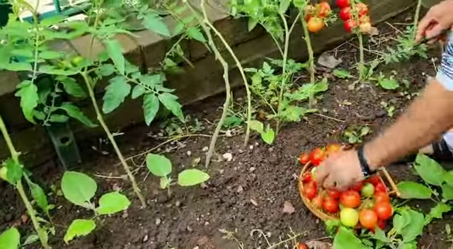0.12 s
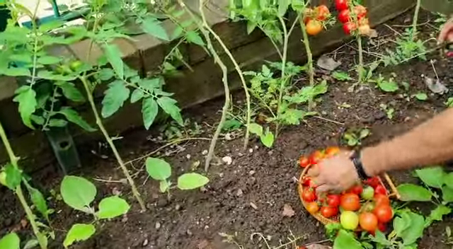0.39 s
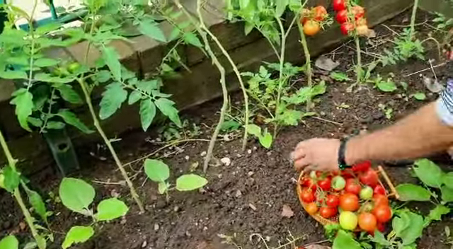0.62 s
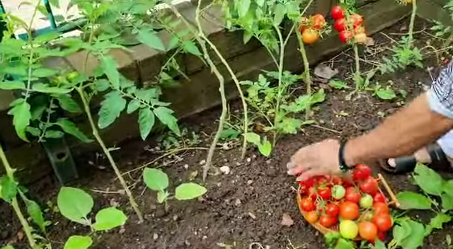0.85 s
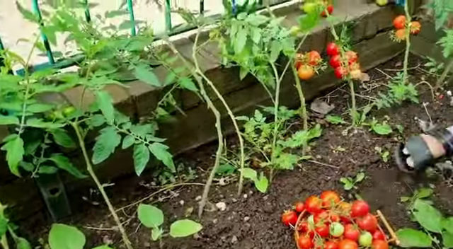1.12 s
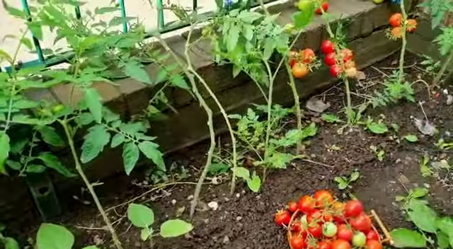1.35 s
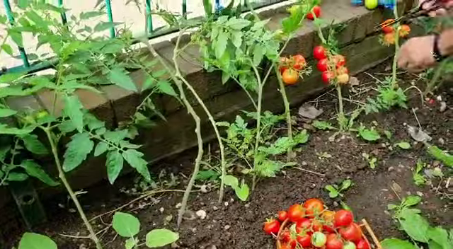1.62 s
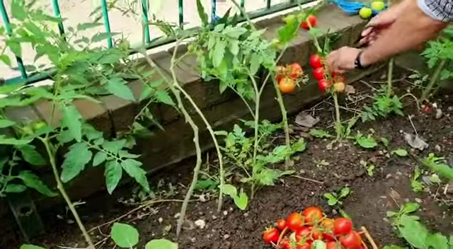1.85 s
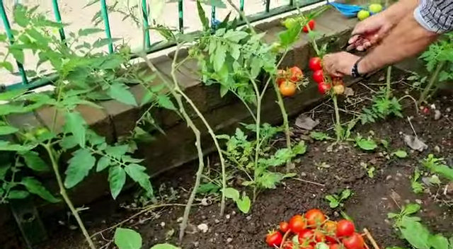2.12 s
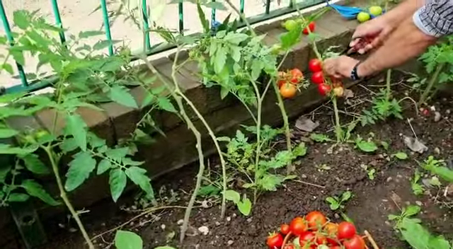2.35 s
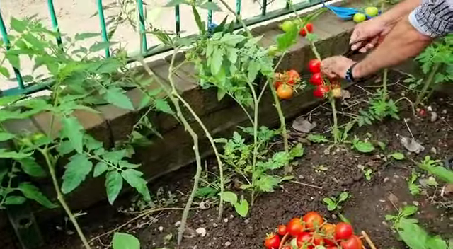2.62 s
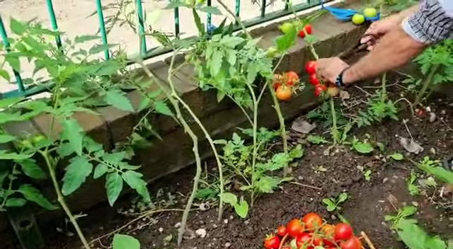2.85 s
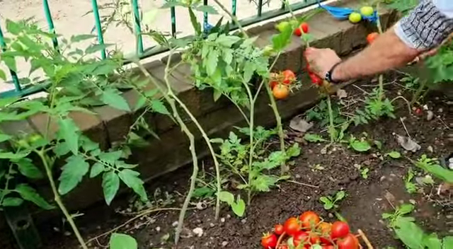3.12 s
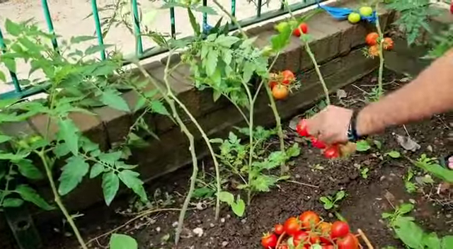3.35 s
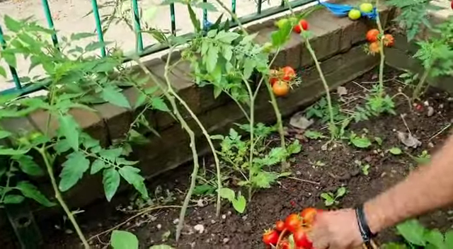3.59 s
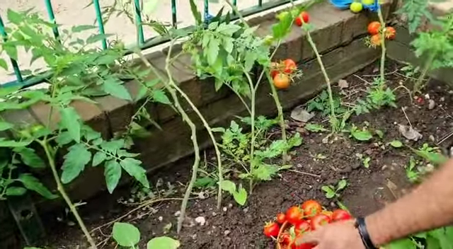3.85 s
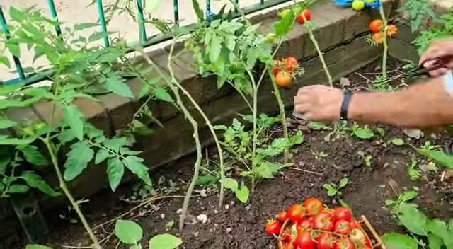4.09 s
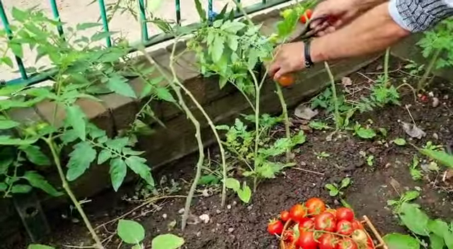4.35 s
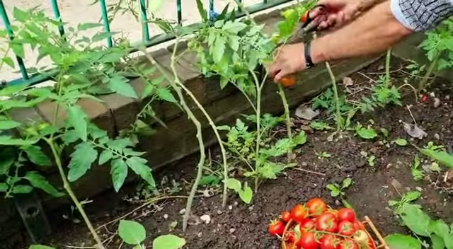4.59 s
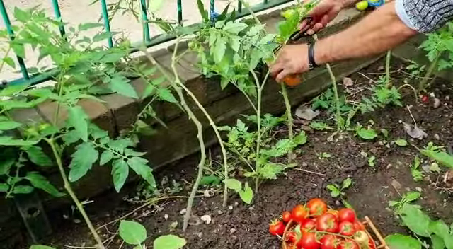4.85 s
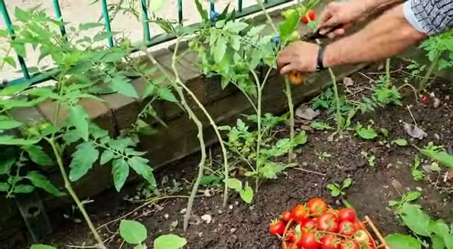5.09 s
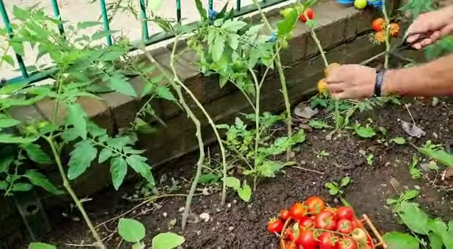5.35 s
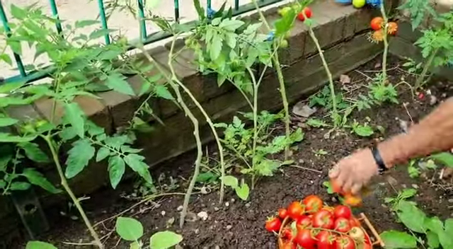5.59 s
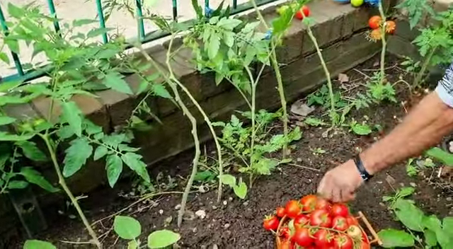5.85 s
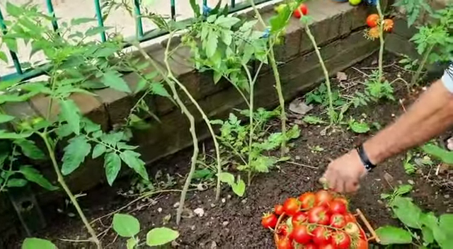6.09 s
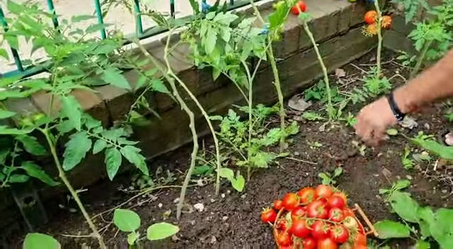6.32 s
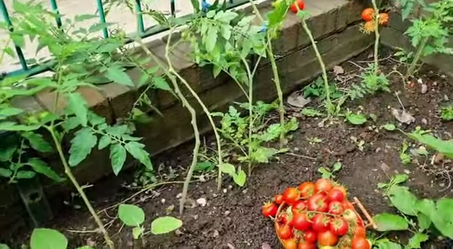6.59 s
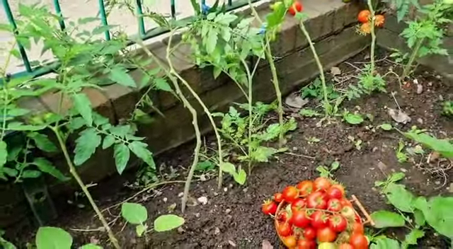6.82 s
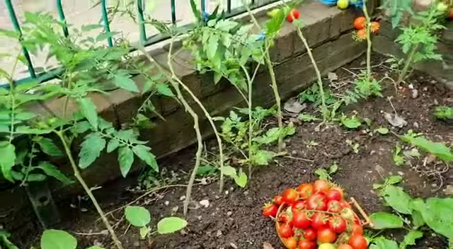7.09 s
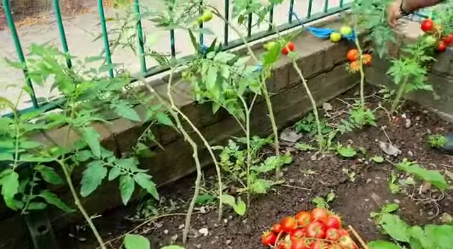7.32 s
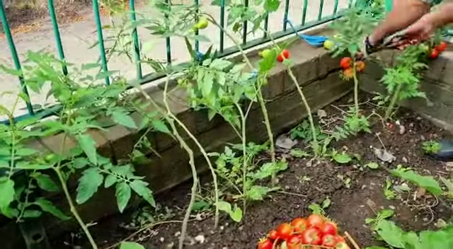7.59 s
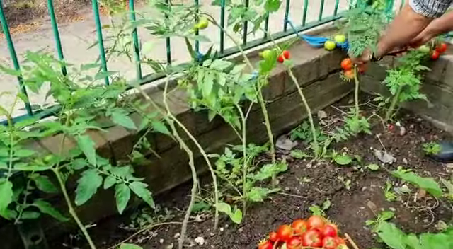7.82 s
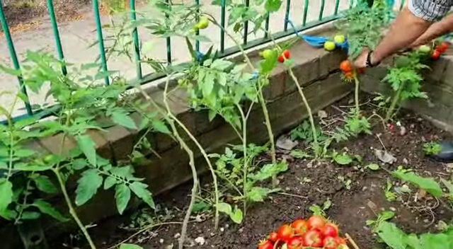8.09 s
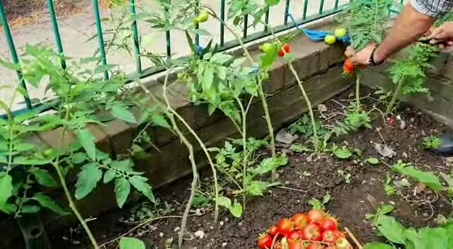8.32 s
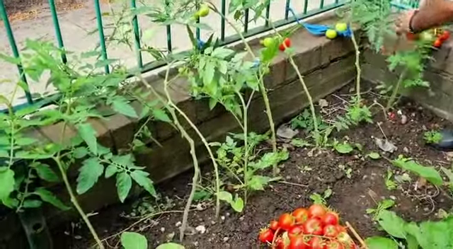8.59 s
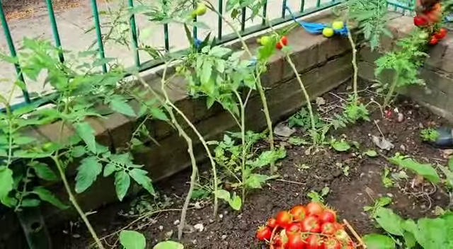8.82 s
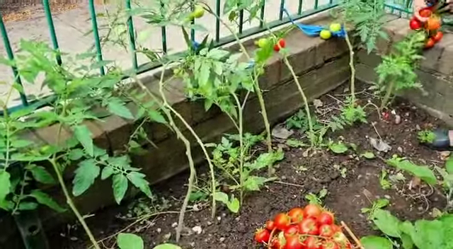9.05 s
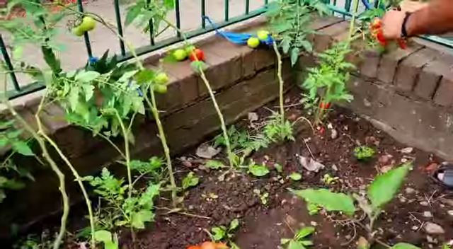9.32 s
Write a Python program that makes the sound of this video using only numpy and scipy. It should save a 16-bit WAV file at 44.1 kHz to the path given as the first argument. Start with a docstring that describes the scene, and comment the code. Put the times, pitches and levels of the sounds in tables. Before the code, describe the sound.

Distant crow caws and a chattering flock fill a quiet garden. A bright shear snip sounds before three seconds, followed by a run of strong, buzzing bird whistles with falling croaky ends. Another snip comes near five seconds, and more rapid chirps follow, some leaping up in pitch. Late on, the air thins almost to silence among small knocks and scuffs, then a loud caw. Close outdoor stereo pickup, distant birds blurred by trees.

```python
"""Throbbing, raspy chirps of one near bird echo off far walls, while crows caw, small birds chatter and a far whistle glides.
Close by, shears snip stalks and leaves tick; soft knocks and rustles come from the ground, and dull low thumps
sound, two of them under loud chirps. Birds are swept sines with noise for breath and hoarseness; shears are ringing
blades with a noise crunch. Below lies wide patchy noise for the garden air, with a centred engine hum and thin tones."""
import sys
import numpy as np
from scipy import signal
from scipy.fft import rfft, irfft, next_fast_len
from scipy.io import wavfile
from scipy.ndimage import uniform_filter1d, map_coordinates

SR = 44100
rng = np.random.default_rng(int(sys.argv[2]) if len(sys.argv) > 2 else 0)


def attenuation_scalar(level_db):
    """Turn a level in dB into a linear amplitude multiplier (20 dB per decade)."""
    decades = np.asarray(level_db, float) / 20
    return 10 ** decades


def pcm_store(signal):
    """Save signal as 16-bit PCM."""
    levels = np.round(np.clip(np.atleast_2d(signal), -1, 1) * 32767)
    wavfile.write(sys.argv[1], SR, levels.astype(np.int16).T)


N = 416304
TIME = np.arange(N) / SR

# Levels in the tables are relative: many sources add a trim.
# Garden air, unlike in both ears. Each row: frequency in Hz, density in dB per Hz.
WIDE_AIR = [(15, -38.5), (25, -6), (70, -1.5), (212, -10), (326, -11), (503, -16.5), (1260, -17),
            (1840, -18.5), (3250, -28.5), (3720, -25), (7310, -45.5), (12500, -42), (16000, -39.5)]
# Air around the birds. Each row: frequency in Hz, density in dB per Hz.
CENTRE_AIR = [(15, -29.5), (25, -11.5), (102, -13), (175, -23), (335, -8), (427, -24), (503, -11),
              (575, -14), (887, -9.5), (1560, -12.5), (2220, -18.5), (3340, -20.5), (4870, -23.5),
              (6210, -27), (16000, -39)]
# Garden level, which fades out and back. Each row: time in seconds, level in dB.
GARDEN_LEVEL = [(0, -62), (2.5, -61.5), (5, -64.5), (8.2, -64), (8.45, -95), (9.05, -101.5), (9.25, -71.5),
                (9.44, -63.5)]
# Far engine. Each row: time in seconds, pitch in Hz, level in dB.
ENGINE_HUM = [(0.0, 97.8, -56), (0.47, 119.4, -56), (0.72, 110, -68), (0.88, 92.6, -59.5),
              (1.13, 89.9, -70), (1.25, 79.8, -61), (1.71, 98.9, -64.5), (2.45, 115, -56.5),
              (2.6, 89.94, -76), (2.87, 76.9, -64), (4.4, 86.7, -77.5), (4.63, 77.5, -63),
              (5.07, 95, -64.5), (5.63, 78.1, -63.5), (5.81, 100.1, -55.5), (6.18, 82, -65),
              (6.52, 88, -62.5), (6.7, 78, -71.5), (7.86, 75.9, -64.5), (8.3, 79.3, -77.5),
              (9.44, 80.3, -74)]
# Thin steady tones. Each row: frequency in Hz, level in dB at the start.
THIN_TONES = [(1900, -91), (3800, -76)]
# Feet and basket shifting on soil. Each row: start in seconds, hold in seconds, level in dB.
SOIL_SCUFFS = [(6.57, 0.034, -55.5), (8.28, 0.02, -60.5), (8.393, .01, -60), (8.5, 0.05, -69),
               (8.628, 0.025, -59.5), (8.722, 0.016, -60.5), (8.872, 0.012, -77), (9.025, .012, -70),
               (9.138, .012, -67)]
# Dull low thumps. Each row: start in seconds, hold in seconds, level in dB.
LOW_THUMPS = [(3.63, .03, -55.5), (4.16, 0.036, -44.5), (6.57, 0.014, -57)]
# Bursts of the flock. Each row: start in seconds, hold in seconds, then mid, high and low voices in dB.
FLOCK_BURSTS = [(0.14, .15, -59.5, -59, -67.5), (0.35, .2, -65, -58, -67), (0.753, .08, -63.5, -54.5, -72),
                (0.88, .06, -56, -64.5, -60), (1.444, .05, -60.5, -57.5, -67.5),
                (1.534, .06, -58, -60.5, -63.5), (1.745, .02, -68.5, -80, -71),
                (1.986, .2, -54.5, -58.5, -59), (2.284, .13, -56, -55.5, -65),
                (2.578, .03, -65, -60.5, -83.5), (2.667, .07, -80, -65.5, -68.5),
                (2.841, .14, -54, -53.5, -79), (3.019, .13, -61, -61, -72), (3.257, .02, -61, -61, -61),
                (3.383, .01, -64.5, -66, -69), (3.491, .05, -60, -59, -63), (3.787, .07, -60.5, -68, -68),
                (4.34, .02, -75, -67, -63), (4.426, .05, -85, -77, -85), (4.66, .03, -77, -80, -81),
                (4.802, .05, -65.5, -69, -71), (4.949, .08, -73, -71, -68), (5.083, .06, -72, -70, -70.5),
                (5.366, .03, -63, -75.5, -71), (5.469, .04, -74, -74, -63.5), (5.65, .06, -64.5, -61, -66),
                (5.892, .06, -66.5, -65, -67), (6.062, .1, -66.5, -64.5, -90),
                (6.217, .07, -61.5, -59, -69), (6.418, .05, -59.5, -61, -59.5),
                (6.56, .18, -68, -76, -70.5), (7.012, .05, -61.5, -62, -76),
                (7.128, .01, -68.5, -71.5, -62.5), (7.52, .03, -78, -73, -81), (7.636, .06, -74, -73, -68),
                (7.833, .02, -64, -75.5, -80), (7.888, .02, -93, -83, -67), (7.99, .02, -76.5, -87, -90.5),
                (8.364, .11, -65.5, -79.5, -68.5), (8.547, .3, -82, -106, -72),
                (9.135, .04, -71, -68.5, -65), (9.33, .11, -70.5, -61.5, -60.5)]
# Far whistle. Each row: start in seconds, hold in seconds, level in dB, first pitch in Hz, top pitch in Hz.
FAR_GLIDES = [(1.67, 0.095, -64, 1235, 1291), (3.83, 0.21, -64, 1020, 1316), (5.4, 0.27, -60, 1039, 1341),
              (7.5, .45, -68, 1083, 1383)]
# Short, rough high notes of small birds. Each row: start in seconds, hold in seconds, level in dB,
# first and last pitch in Hz.
HIGH_NOTES = [(.868, 0.003, -42, 5020, 4980), (1.465, 0.026, -55, 5250, 4965),
              (1.532, .01, -50.5, 4998, 5070), (2.153, 0.0051, -46.5, 5030, 5300),
              (2.66, 0.022, -66, 4308, 4430), (5.81, 0.031, -58.5, 6150, 6000),
              (5.875, 0.052, -60.5, 5260, 4970), (6.435, 0.055, -70, 2930, 2790),
              (8.335, .03, -57.5, 5940, 5815), (8.39, .012, -55.5, 6010, 6096),
              (8.43, .07, -64.5, 5930, 5750), (9.135, 0.029, -51.5, 3950, 3240),
              (9.345, 0.025, -56, 6130, 6560)]
# Short low notes far off. Each row: start in seconds, hold in seconds, level in dB, first and last pitch in Hz.
LOW_NOTES = [(8.557, 0.0047, -59, 1374, 1500), (8.862, 0.018, -65, 880, 888), (8.975, 0.011, -63, 894, 913),
             (9.028, .01, -65, 903, 900)]
# Crows. Each row: start in seconds, hold in seconds, level in dB, strongest overtone in Hz, lower overtones in dB.
CROW_CAWS = [(.13, 0.18, -53, 1955, -11.5), (.36, .17, -42, 1688, -11), (.74, .1, -43, 1963, -12.5),
             (1.41, .17, -45, 1703, -10), (1.86, 0.032, -59, 1731, -2), (2.0, .12, -43, 1774, -13.5),
             (2.24, 0.088, -44, 1982, -12.5), (2.4, .1, -54, 1848, -4), (2.84, .22, -52, 1940, -3.5),
             (3.25, .08, -61, 1862, -2), (4.93, 0.2, -50.5, 1720, -17), (5.38, .17, -58, 1641, -2),
             (5.6, .12, -48, 1616, -13), (5.85, 0.095, -62.5, 1760, -3), (6.08, .12, -53, 1897, -7.5),
             (6.23, .11, -41, 1713, -12), (6.41, .1, -54, 1770, -13), (6.87, .13, -47, 1738, -12.5),
             (7.06, .07, -54, 1658, -9.5), (7.53, 0.358, -66, 1713, 4.5), (8.42, 0.16, -59.5, 1722, -20),
             (8.96, 0.019, -58, 1719, -16), (9.07, .04, -65.5, 1653, -24), (9.285, .16, -39, 2041, -13.5)]
# Shears closing. Each row: time in seconds, level in dB, ring in Hz, left over right in dB, crunch in dB.
SHEAR_SNIPS = [(2.777, -13.5, 14000, -3.5, -10), (5.111, -14.5, 13500, 2.5, -17.5),
               (8.2135, -27, 13490, -9, -27)]
# Ringing of the blades. Each row: frequency in Hz, level in dB, 60 dB decay in seconds.
BLADE_RINGS = [(2130, -18.5, 0.019), (10100, -6, 0.00626), (12600, 0, 0.0049), (13500, -0.5, 0.0064),
               (15000, -10.5, 0.017)]
# Ticking leaves. Each row: time in seconds, level in dB, left over right in dB.
LEAF_TICKS = [(1.278, -38, -4.5), (1.4284, -44, 19), (6.51, -51.5, 0.5), (6.576, -60, -3),
              (8.0376, -43.5, -1), (8.2854, -46, 7), (8.387, -37.5, 7), (8.9035, -43.5, 2),
              (9.148, -44.5, 1)]
# Knocks on soil and basket. Each row: time in seconds, level in dB, pitch in Hz, left over right in dB.
SOFT_KNOCKS = [(1.876, -38, 1083, 2), (6.573, -40.5, 241.3, -9), (8.395, -34, 351, 0.0),
               (8.5, -53, 383, 0.0), (8.53, -48, 151, 0.0), (8.626, -48, 273, 1), (8.72, -50, 308, 0.0),
               (8.744, -51, 339, 0.0), (9.096, -59.5, 872, 0.0), (9.146, -51, 277, 0.0)]
# The near bird's whistle, a list for each stretch; a note that leaps in pitch has several.
# Each row: time in seconds, pitch in Hz, level in dB, octave in dB.
WHISTLE_STRETCHES = [
    [(2.02, 3530, -56, -46), (2.05, 3670, -56, -47), (2.066, 3590, -50, -46), (2.08, 3550, -49, -42),
     (2.095, 3600, -60, -52)],
    [(3.355, 3525, -45, -35), (3.375, 3397, -56, -46), (3.39, 3460, -32, -26.5), (3.402, 3410, -32, -29.5),
     (3.425, 3480, -26.5, -25), (3.44, 3390, -25, -32), (3.455, 3590, -47, -38), (3.485, 3550, -57, -42)],
    [(3.584, 3510, -48, -41), (3.594, 3640, -46, -36), (3.602, 3520, -56, -47), (3.609, 3510, -37, -23.5),
     (3.628, 3645, -35, -20.5), (3.648, 3550, -28.5, -22.5), (3.66, 3530, -28, -32),
     (3.675, 3490, -37, -41), (3.695, 3100, -39, -63), (3.725, 3080, -39, -66), (3.76, 3150, -51, -55)],
    [(3.897, 3636, -58, -38), (3.912, 3546, -35, -35), (3.925, 3296, -26.5, -41), (3.942, 3323, -18.5, -30),
     (3.963, 3290, -19.5, -24.5), (3.983, 3250, -17, -31), (3.995, 3130, -28, -39), (4.005, 3620, -49, -32),
     (4.025, 3750, -61, -33)],
    [(4.136, 3360, -35, -32.5), (4.15, 3530, -36, -23.5), (4.168, 3660, -32, -18.5),
     (4.187, 3630, -33, -18.5), (4.203, 3530, -27.5, -26), (4.215, 3330, -21, -35),
     (4.226, 3320, -28.5, -55), (4.24, 3290, -48.5, -53), (4.275, 3210, -42.5, -61),
     (4.305, 3510, -48.5, -52)],
    [(4.505, 3560, -63, -35), (4.52, 3620, -57, -46), (4.528, 3450, -28.5, -20.5),
     (4.539, 3180, -29, -43.5), (4.568, 3235, -23, -37), (4.59, 3198, -22, -35), (4.606, 3083, -24, -37),
     (4.615, 3070, -44, -46)],
    [(6.296, 3236, -48.5, -36), (6.312, 3298, -38, -39), (6.321, 3440, -26, -26), (6.329, 3270, -31, -30.5),
     (6.336, 2986, -28, -29.5), (6.35, 2958, -27, -23), (6.37, 2958, -27, -27), (6.384, 3015, -41, -44),
     (6.392, 3065, -42, -46)],
    [(6.872, 3195, -55, -36), (6.888, 3255, -32.5, -39), (6.9, 3290, -33.5, -41.5)],
    [(6.901, 4750, -30, -62), (6.914, 4940, -24.5, -60), (6.931, 4810, -33, -56)],
    [(6.932, 3420, -24.5, -26), (6.955, 3166, -22.5, -34), (6.975, 3250, -25, -31), (6.995, 3224, -36, -53)],
    [(7.138, 3126, -36, -34), (7.156, 3200, -38.5, -52), (7.167, 3167, -26, -41), (7.182, 3004, -19, -31),
     (7.193, 3032, -18.5, -27.5), (7.207, 3003, -21, -24.5), (7.22, 3004, -24.5, -25),
     (7.232, 3110, -36, -33.5), (7.252, 3020, -42, -53)],
    [(7.362, 3540, -43, -74), (7.376, 3300, -35.5, -45), (7.381, 3140, -22.5, -26),
     (7.392, 3535, -22.5, -31.5)],
    [(7.393, 4870, -23.5, -39), (7.414, 5110, -23, -41.5), (7.438, 4945, -26.5, -46)],
    [(7.439, 3370, -27, -34), (7.46, 3360, -24, -35.5), (7.478, 3363, -28.5, -48), (7.5, 3243, -41.5, -52)],
]
# Runs of throbbing. Each row: first crest in seconds, length in seconds (rounded to whole throbs),
# throbs per second, depth (kept within 0-1), glide within a throb in Hz before scaling.
THROB_RUNS = [(2.027, .06, 130, 0.73, -3.5), (3.3575, .125, 116, 0.89, 94), (3.592, .011, 160, .8, 32.5),
              (3.6092, .05, 58, 1, 29.5), (3.663, .09, 95, 0.72, -150), (3.9034, .115, 112, 0.86, -50.5),
              (4.148, .054, 55, .9, 50), (4.213, .09, 150, 0.73, 97), (4.506, .1, 117, 0.74, -21),
              (6.3034, .019, 120, 0.84, 53.5), (6.321, .024, 42, 1, -20), (6.346, .024, 39, 0.8, -19.5),
              (6.877, .022, 95, .7, -0.5), (6.907, .022, 98, .4, 55), (6.9348, .056, 125, .8, -350),
              (7.144, .036, 82, .95, -200), (7.18, .05, 72, .3, -1.5), (7.2304, .02, 110, 0.9, -48.5),
              (7.37, .02, 95, 0.38, 201.5), (7.399, .036, 111, 0.54, 52), (7.4364, .055, 190, 0.71, -300)]
# Hoarse breath of the near bird. Each row: start in seconds, hold in seconds, level in dB.
BREATHS = [(2.035, .03, -55), (3.378, 0.086, -53.5), (3.64, 0.033, -63), (3.694, 0.062, -65.5),
           (3.92, .01, -50.5), (3.988, 0.029, -53.5), (4.152, 0.038, -63.5), (4.222, 0.072, -57.5),
           (4.509, 0.064, -60.5), (4.61, 0.017, -57), (6.305, .035, -56.5), (6.378, 0.0092, -51.5),
           (6.893, 0.011, -53.5), (6.938, 0.041, -49), (7.157, 0.0094, -46), (7.23, 0.01, -54.5),
           (7.386, 0.0047, -53), (7.435, 0.046, -52)]
# Colour of that breath. Each row: frequency in Hz, density in dB per Hz.
BREATH_COLOUR = [(530, -46.5), (900, -13.5), (1440, -14.5), (1900, -16), (2450, -8.5), (2890, -4.5),
                 (3260, -6), (4460, -7), (5480, -9.5), (6410, -9), (7580, -2.5), (8660, -46), (10100, -38),
                 (13200, -31), (16000, -67.5)]
# Falling ends of the chirps. Each row: start in seconds, hold in seconds, level in dB, first and last pitch in Hz.
CHIRP_CROAKS = [(3.447, .03, -46.5, 2310, 2026), (3.67, 0.11, -48, 2130, 1101),
                (3.997, .035, -41.5, 2355, 2100), (4.228, .115, -50.5, 1988, 1116),
                (4.625, .015, -43.5, 2320, 2257), (6.393, .025, -43, 1876, 1810),
                (6.977, .03, -43, 1714, 1585), (7.222, .025, -44.5, 2312, 2153),
                (7.31, .012, -52.5, 991, 1051), (7.442, .03, -49, 1570, 1862)]
# Echoes off the far walls. Each row: delay in seconds, level in dB.
WALL_ECHOES = [(.106, -27), (.23, -33)]


def unit(x):
    """Scaled to rms 1."""
    return x / np.sqrt(np.mean(x ** 2) + 1e-20)


def along(points, hz):
    """Reads (Hz, value) points on a log frequency axis."""
    f, v = np.transpose(points)
    return np.interp(np.log(hz + 1), np.log(f + 1), v)


def wobble(rate):
    """A smooth random curve, rate knots a second."""
    return map_coordinates(rng.standard_normal(int(N * rate / SR) + 4), [TIME * rate])


def filtered(x, response):
    """Shapes x by a complex response of frequency."""
    m = next_fast_len(N + 8192)
    return irfft(rfft(x, m) * response(np.fft.rfftfreq(m, 1 / SR)), m)[..., :N]


def ring(f, hz, width):
    """Response of a causal resonance."""
    return 1j * f * width / (hz * hz - f * f + 1j * f * width)


def cycles(hz):
    """Phase of a changing pitch."""
    return 2 * np.pi * np.cumsum(hz, axis=-1) / SR


def phrases(tables, ramp=0.0075):
    """Columns of all phrases per sample, and a gate that is open while one sounds."""
    s, *cols = np.transpose(np.concatenate(sorted(tables)))
    gate = sum(np.clip(np.minimum(TIME - p[0][0], p[-1][0] - TIME) / ramp + .5, 0, 1) for p in tables)
    return [np.interp(TIME, s, c) for c in cols], np.minimum(gate, 1)


def swells(rows, rise_s, fall_s):
    """Rise, hold and fall: gain, progress 0-1 through the hold, and the other columns, led by the louder row."""
    fade_db = 20  # a rise or fall time is the time for this many dB
    gain, weight, cols = np.zeros(N), np.zeros(N), np.zeros((len(rows[0]) - 2, N))
    for s, hold_s, db, *rest in rows:
        at = slice(max(int((s - 2 * rise_s) * SR), 0), int((s + hold_s + 2 * fall_s) * SR))
        t = TIME[at] - s
        outside = np.maximum(np.maximum(-t / rise_s, (t - hold_s) / fall_s), 0)
        g = attenuation_scalar(db - fade_db * outside)
        progress = np.clip(t / max(hold_s, 1e-3), 0, 1)
        gain[at] += g
        weight[at] += g * g
        cols[:, at] += g * g * np.array([progress, *np.outer(rest, np.ones_like(t))])
    return gain, *(cols / (weight + 1e-30))


def air(spectrum, patchy_db):
    """Coloured noise of rms 1 with patches of random gain over time and frequency."""
    z = signal.stft(rng.standard_normal(N + 512), nperseg=512)[2]
    field = uniform_filter1d(uniform_filter1d(rng.standard_normal(z.shape), 6, 0), 12, 1)
    patchy = signal.istft(z * attenuation_scalar(patchy_db * unit(field)), nperseg=512)[1][:N]
    return unit(filtered(patchy, lambda hz: attenuation_scalar(along(spectrum, hz))))


def trees(x, t60, wet_db):
    """Adds scattered return from trees and walls, a new decaying noise tail every third of a second."""
    out, step, t = np.zeros(N + SR), SR // 3, np.arange(SR // 2) / SR
    for k in range(0, N, step):
        tail = rng.standard_normal(len(t)) * attenuation_scalar(-60 * t / t60)
        wet = signal.fftconvolve(x[k:k + step], tail / np.linalg.norm(tail))
        out[k:k + len(wet)] += wet
    return x + attenuation_scalar(wet_db) * filtered(out[:N], lambda f: 1 / (1 + (f / 9000) ** 4))  # leaves swallow the treble


def add(out, s, sound, pan_db, lead_ms=0.):
    """Places a sound between the ears by level, and by reaching the left ear first."""
    for ear, side in enumerate((1, -1)):
        at = round(s * SR) + ear * round(lead_ms * SR / 1000)
        out[ear, at:at + len(sound)] += attenuation_scalar(side * pan_db / 2) * sound


def background():
    """Patchy noise for wide and centred air, an engine hum on a drifting pitch, and thin tones unlike in both ears."""
    level = attenuation_scalar(np.interp(TIME, *np.transpose(GARDEN_LEVEL)))
    side = level * attenuation_scalar(1.5 * wobble(12)) * air(WIDE_AIR, patchy_db=2.5)
    mid = level * attenuation_scalar(0.5) * air(WIDE_AIR, patchy_db=5.5)
    (hz, db), _ = phrases([ENGINE_HUM])
    hum = attenuation_scalar(db - 0.5 + 2.8 * wobble(13)) * np.sin(cycles(hz + 8 * wobble(25)))

    def thin_tones():
        """Sines that waver slightly in level and pitch."""
        return sum(attenuation_scalar(tone_db + 3.5 * wobble(12.0)) * np.sin(cycles(tone_hz + 4 * wobble(24)))
                   for tone_hz, tone_db in THIN_TONES)

    tones = np.array([thin_tones(), thin_tones()])
    centre = attenuation_scalar(-67 + 2.2 * wobble(1.377)) * air(CENTRE_AIR, patchy_db=2.5) + hum
    opposed = np.array([side * attenuation_scalar(-1.8), -side * attenuation_scalar(2.5)])  # opposite polarity makes it wide
    return centre + mid + opposed + tones * level / level[0]


def scuff():
    """Lumpy low rustle of resonant noise, and duller thumps that differ between the ears."""
    grit = attenuation_scalar(4.2 * wobble(70)) * rng.standard_normal(N)
    grit = unit(filtered(grit, lambda f: ring(f, 260, 640) ** 2))
    rustle = swells(SOIL_SCUFFS, rise_s=0.029, fall_s=0.056)[0] * grit
    thumps = unit(filtered(rng.standard_normal((2, N)), lambda f: ring(f, 70, 260) ** 2))
    return rustle + swells(LOW_THUMPS, rise_s=0.046, fall_s=.04)[0] * thumps


def twitter(hz, spread_hz, count, wash):
    """Many short, mostly falling notes at random moments over a band of steady noise, rms 1."""
    when, pitch, slide, life, size = rng.random((count, 5)).T
    t = np.arange(1400) / SR
    span = (0.0087 + .02 * life)[:, None]
    start_hz = (hz + spread_hz * (2 * pitch - 1))[:, None]
    slide_hz = (1800 * (slide - .7))[:, None]
    turn = 2 * np.pi * (start_hz * t + slide_hz * (t * t / (2 * span) - t / 2))
    shape = np.sin(np.pi * np.minimum(t / span, 1)) ** 2
    each = attenuation_scalar(10 * size)[:, None] * shape * np.sin(turn)
    at = (when * N).astype(int)[:, None] + np.arange(1400)
    together = np.bincount(at.ravel(), each.ravel(), N)[:N]
    band = filtered(rng.standard_normal(N), lambda f: np.exp(-((f - hz) / (1.46 * spread_hz)) ** 2))
    return unit(unit(together) + wash * unit(band))


def flock():
    """Small birds far off: three registers of twitter, each swelling in bursts."""
    s, hold_s, *levels_db = np.transpose(FLOCK_BURSTS)
    mid, high, low = (swells(np.transpose([s, hold_s, db]), rise_s=0.074, fall_s=0.13)[0] for db in levels_db)
    mid = mid * twitter(5150, 650, count=900, wash=.75)
    high = high * twitter(7350, 520, count=1200, wash=.85)
    low = low * twitter(3250, 500, count=500, wash=.7)
    return trees(attenuation_scalar(-1.5) * (mid + high + low), t60=.18, wet_db=-5)


def whistles(gain, hz, shake_hz, wet_db):
    """Far notes: a sine with a shaky pitch and level, scattered by the trees."""
    tone = gain * attenuation_scalar(5.5 + 1.6 * wobble(60)) * np.sin(cycles(hz + shake_hz * wobble(200)))
    return trees(tone, t60=.3, wet_db=wet_db)


def glides():
    """The far whistle climbs slowly to its top and drops fast."""
    top_at, drop_hz = 0.96, 230  # share of the hold at which it peaks, fall after that
    gain, u, first_hz, top_hz = swells(FAR_GLIDES, rise_s=.04, fall_s=0.036)
    climb = np.minimum(u / top_at, 1)
    drop = np.maximum(u - top_at, 0) / (1 - top_at)
    hz = first_hz + (top_hz - first_hz) * climb ** 1.3 - drop_hz * drop ** 1.8
    return whistles(gain, hz, 6.64, wet_db=-4.5)


def notes(rows, shake_hz, wet_db):
    """Short notes that slide straight from their first pitch to their last."""
    gain, u, first_hz, last_hz = swells(rows, rise_s=0.021, fall_s=0.022)
    return whistles(gain, first_hz + (last_hz - first_hz) * u, shake_hz, wet_db)


def crows():
    """Hoarse stacks of overtones on a shaky pitch; the throat favours one overtone, distance blurs all."""
    gain, u, hz, low_db = swells(CROW_CAWS, rise_s=.07, fall_s=.16)
    hz = np.maximum(hz + 60 * (.5 - u), 900)  # each caw sags a little
    pitch = uniform_filter1d(hz / np.round(hz / 420), size=800)  # a fundamental near 420 Hz
    turn = cycles(pitch + 15 * wobble(120) + 5 * wobble(25))
    top = np.zeros(N)
    for k in range(3, 9):
        favour_db = np.maximum(-11 * ((k * pitch - hz) / 420) ** 2, -30)
        top += attenuation_scalar(favour_db + 3.3 * wobble(40)) * np.sin(k * turn)
    top_hiss = filtered(rng.standard_normal(N), lambda f: ring(f, 1800, 700) ** 3)
    top = unit(top) + .75 * unit(top_hiss)
    low = attenuation_scalar(3 * wobble(40)) * np.sin(2 * turn) + attenuation_scalar(-4.5 + 5.7 * wobble(40)) * np.sin(3 * turn)
    low_hiss = filtered(rng.standard_normal(N), lambda f: ring(f, 1000, 600) ** 2)
    low = unit(low) + 1.1 * unit(low_hiss)
    caw = gain * attenuation_scalar(-7.0) * (top + attenuation_scalar(low_db) * low)
    caw = filtered(caw, lambda f: 1 / (1 + (f / 2400) ** 14) + 0.074)  # the throat cuts off sharply
    return trees(caw, t60=0.33, wet_db=-4.5)


def hands():
    """Shears crunch through a stalk and clack shut; leaves tick; soft knocks on soil and basket."""
    out, t = np.zeros((2, N + SR)), np.arange(3000) / SR

    def bright():
        """Noise tilted towards the treble."""
        return np.diff(rng.standard_normal(len(t) + 1))

    for s, db, hz, pan_db, crunch_db in SHEAR_SNIPS:
        clack = sum(attenuation_scalar(level + rng.normal(0, 0.96) - 60 * t / t60) * np.sin(2 * np.pi * f * t)
                    for f, level, t60 in BLADE_RINGS)
        clack += 1.3 * attenuation_scalar(-60 * t / 0.0084) * np.sin(2 * np.pi * hz * t)
        clack += bright() * (0.24 * attenuation_scalar(-60 * t / .02) + 0.027 * attenuation_scalar(-60 * t / 0.1))
        add(out, s, attenuation_scalar(db - 3) * np.minimum(t / .0003, 1) * clack, pan_db, lead_ms=.023)
        add(out, s - .003, attenuation_scalar(db - 15.5) * clack, pan_db)  # the blades touch just before they close
        grains = 0.3 + (rng.random(len(t)) < .03) * 1.0
        crunch = rng.standard_normal(len(t)) * attenuation_scalar(-60 * t / 0.1) * grains
        add(out, s - .0105, attenuation_scalar(db + crunch_db) * uniform_filter1d(crunch, size=3), pan_db, lead_ms=.5)
    for s, db, pan_db in LEAF_TICKS:
        add(out, s, attenuation_scalar(db - 12.5 - 60 * t / 0.01) * bright(), pan_db)
    for s, db, hz, pan_db in SOFT_KNOCKS:
        body = np.sin(2 * np.pi * hz * t) * attenuation_scalar(-60 * t / 0.027)
        dull = np.convolve(rng.standard_normal(len(t)), np.hanning(24) / 12, 'same')
        add(out, s, attenuation_scalar(db - 2.5) * (body + 2.7 * dull * attenuation_scalar(-60 * t / 0.014)), pan_db)
    return out[:, :N]


def throbbing():
    """Gain that dips between throbs, pitch glide through each throb, depth, and width of the pitch scatter."""
    dip_s = 0.0051  # the gap lasts about this long in slow throbs, and shortens in fast ones
    hoarse_hz, smooth_rate = 5.5, 108  # extra scatter for each throb a second above the smooth rate
    gain, bend_hz, deep, scatter_hz = np.ones(N), np.zeros(N), np.zeros(N), np.zeros(N)
    for s, length, rate, depth, glide_hz in THROB_RUNS:
        at = slice(round(s * SR), round((s + round(length * rate) / rate) * SR))
        turn = np.pi * rate * (TIME[at] - s)
        narrow = max(.5 / (rate * dip_s) ** 2, 1)
        deep[at] = np.clip(depth, 0, 1)
        gain[at] *= 1 - deep[at] * abs(np.sin(turn)) ** narrow
        bend_hz[at] += glide_hz * np.sin(2 * turn)
        # wide glides and fast throbs are unsteady
        scatter_hz[at] = abs(glide_hz) + hoarse_hz * max(rate - smooth_rate, 0)
    return uniform_filter1d([gain, bend_hz, deep, scatter_hz], size=40)


def near_bird():
    """A throbbing whistle with overtones, fluttering breath and a rough falling croak, echoed by walls and trees."""
    (hz, db, octave_db), gate = phrases(WHISTLE_STRETCHES, ramp=.004)
    throb, bend_hz, deep, scatter_hz = throbbing()
    uneven = attenuation_scalar(1.5 * deep * [wobble(130), wobble(130)])  # the deeper the throbs, the more uneven
    first = gate * throb * attenuation_scalar(db + 0.37) * uneven[0]
    octave = gate * throb * attenuation_scalar(octave_db - 0.4) * uneven[1]
    turn = cycles(hz + .6 * bend_hz + (18 + .65 * scatter_hz) * wobble(350))
    whistle = first * np.sin(turn) + octave * np.sin(2 * turn)
    whistle += (attenuation_scalar(-29) * octave + attenuation_scalar(-42.5) * first) * np.sin(3 * turn)
    whistle += attenuation_scalar(-40) * first * np.sin(4 * turn)
    beak = np.exp(-((4 * hz - 14600) / 1500) ** 2)  # the beak rings near 14.6 kHz
    whistle += attenuation_scalar(13.5) * beak * octave ** 2 * np.sin(4 * turn)

    breath, _ = swells(BREATHS, rise_s=0.022, fall_s=0.028)
    hiss = attenuation_scalar(1.6 * wobble(220)) * air(BREATH_COLOUR, patchy_db=4.5)
    hiss = filtered(hiss, lambda f: (1 + 5.6 * abs(ring(f, 11700, 680)) ** 2)
                    * (1 - 0.62 * abs(ring(f, 4070, 630)) ** 2))  # a peak and a notch
    rasp = attenuation_scalar(15) * breath * throb ** 0.35 * unit(hiss)

    gain, u, first_hz, last_hz = swells(CHIRP_CROAKS, rise_s=0.014, fall_s=.03)
    fall_hz = first_hz + (last_hz - first_hz) * u ** 3.1
    croak = gain * attenuation_scalar(3 + 4.5 * wobble(260)) * np.sin(cycles(fall_hz + 165 * wobble(600)))

    # the squared octave, band-passed: a low thud under the strong throbs
    thud = filtered(octave ** 2, lambda f: ring(f, 200, 500) * ring(f, 380, 500))
    voice = whistle + rasp + croak
    echoes = sum(attenuation_scalar(echo_db) * np.pad(voice, (round(s * SR), 0))[:N] for s, echo_db in WALL_ECHOES)
    echoes = filtered(echoes, lambda f: 1 / (1 + (f / 6000) ** 6))  # dull after the long way
    return trees(voice, t60=0.22, wet_db=-10.5) + trees(echoes, t60=0.09, wet_db=-17.5) + attenuation_scalar(11.5) * thud


def scene():
    """All birds sit in the centre; the garden is wide."""
    far_birds = flock() + glides() + notes(HIGH_NOTES, 105, wet_db=-5) + notes(LOW_NOTES, 9.8, wet_db=-9)
    return background() + scuff() + far_birds + crows() + hands() + near_bird()


def top_cut(x):
    """Nothing passes above the cut-off."""
    return signal.sosfilt(signal.butter(12, 16670, fs=SR, output="sos"), x)


def record(dry):
    """Cuts everything above 16.6 kHz, then passes the mix on to its last stage."""
    limited = filtered(dry, lambda hz: hz < 16600)
    return top_cut(limited)


dry = scene()
out = record(dry)
pcm_store(out)
```